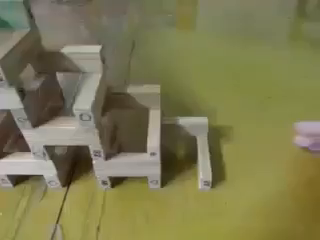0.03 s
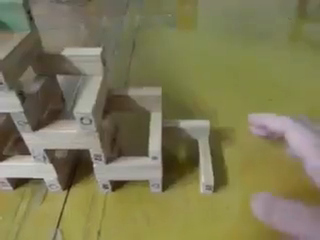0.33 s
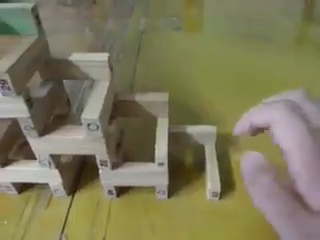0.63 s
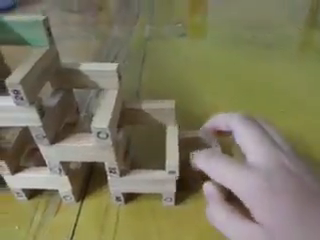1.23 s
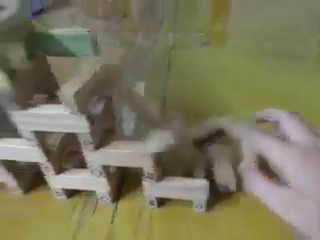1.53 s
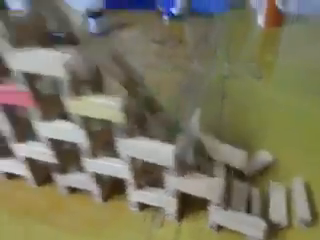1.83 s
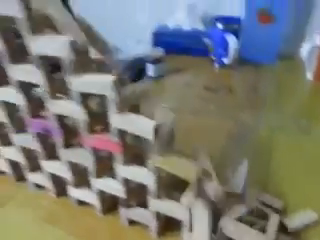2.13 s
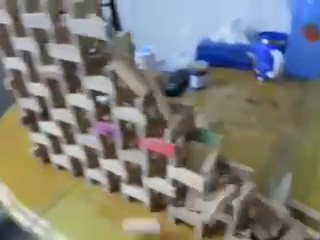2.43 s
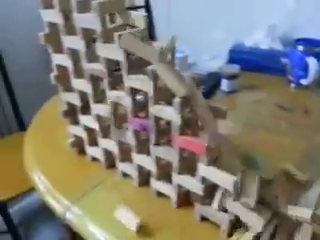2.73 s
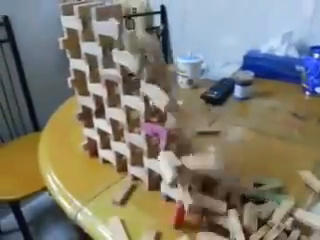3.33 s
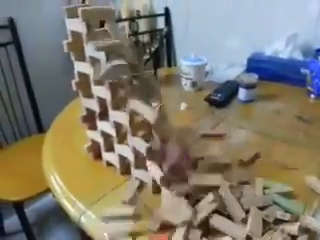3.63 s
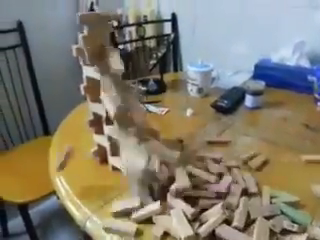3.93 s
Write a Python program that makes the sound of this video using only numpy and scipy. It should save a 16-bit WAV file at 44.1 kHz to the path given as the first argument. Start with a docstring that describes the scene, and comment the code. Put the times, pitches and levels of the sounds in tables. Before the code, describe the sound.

Small wooden blocks topple onto a table in a dense, continuous clatter.

```python
"""A tall wall of small wooden blocks falls onto a wooden table in a small room. First, over faint room noise, a
hand bumps the table, then pushes a block, which squeaks and tips over. An unbroken clatter follows, in which a
few early blocks drop hollowly on the bare table: flat faces knock, edges tick and the tabletop drums, deeper as
the heap grows. Heavy clumps crash down along the way, and midway the microphone is jogged. The clatter runs to
the end, with a limiter softening its loudest moments."""
import sys
import numpy as np
from scipy import signal
from scipy.io import wavfile
from scipy.ndimage import uniform_filter1d

SR = 44100
rng = np.random.default_rng(int(sys.argv[2]) if len(sys.argv) > 2 else 0)


def generate_wav(sig):
    """Save sig (samples, or channels by samples) to the path in sys.argv[1] as 16-bit PCM at SR."""
    pcm = np.round(np.clip(np.atleast_2d(sig).T, -1, 1) * 32767).astype(np.int16)
    wavfile.write(sys.argv[1], SR, pcm)


N = 176400


def amp(db):
    """Turn decibels into a number to multiply by."""
    return 10 ** (np.asarray(db) / 20)


def unit_level(x):
    """Scale a sound to an average power of 1."""
    return x / np.sqrt(np.mean(x ** 2) + 1e-20)


def value_at(points, hz):
    """Read between a table's points, along a pitch-like (log) scale."""
    f, value = np.transpose(points)
    return np.interp(np.log(hz + 1), np.log(f + 1), value)


def add(mix, s, sound):
    """Mix a sound in, starting at s seconds."""
    part = mix[:, max(round(s * SR), 0):][:, :sound.shape[1]]
    part += sound[:, :part.shape[1]]


def convolve(x, response):
    """Let every sample of x set off its own copy of the response."""
    return signal.oaconvolve(np.atleast_2d(x), np.atleast_2d(response), axes=1)[:, :N]


def colour(x, points, size=4096):
    """Turn lows and highs up or down as a tone table says."""
    log_gain = np.log(amp(value_at(points, abs(np.fft.fftfreq(size, 1 / SR)))))
    spectrum = np.exp(np.conj(signal.hilbert(log_gain)))  # nothing rings ahead of a hit
    return convolve(x, np.fft.ifft(spectrum).real[:size // 2])


def stereo_noise(length, apart):
    """Left and right noise: a shared part and a part that differs."""
    mid, side = rng.standard_normal((2, length))
    return np.array([mid + apart * side, mid - apart * side])


# tone of the room noise: f/Hz, level/dB
AIR_TONE = [(30, 1), (150, -1.5), (260, -7), (404, 1), (600, -10), (1400, -15), (7060, -17.5),
            (15000, -34)]


def air(start_s=0.42, fade_s=0.049, level_db=-61.5):
    """Quiet room noise fades in."""
    fade_in = np.clip((np.arange(N) / SR - start_s) / fade_s, 0, 1)
    return amp(level_db) * unit_level(colour(stereo_noise(N, 0.85), AIR_TONE)) * fade_in


# notes the tabletop rings at: f/Hz, level/dB, fade/s (time to drop 60 dB, t60 in the code)
TABLE_NOTES = [(133.2, -12, 0.25), (179.3, -14, 0.19), (253.2, -7, 0.19), (321, -5.5, 0.1),
               (352.8, -4, 0.13), (411, -12.5, 0.13), (514.7, -4, 0.081), (567, -8.5, 0.082),
               (666, 1.5, 0.033), (802.6, 7, 0.054), (863, 3.5, 0.042), (1075, 1.5, 0.025)]


def tabletop(blows, thud, size=12000):
    """Each blow makes the table ring, along with a dead thud."""
    t = np.arange(size) / SR
    ring = thud * stereo_noise(size, 1.0) * np.exp(-t / 0.035)
    for hz, db, t60 in TABLE_NOTES:
        phase = rng.uniform(0, 2 * np.pi) + hz / 1300 * rng.standard_normal((2, 1))
        ring += amp(db - 60 * t / t60) * np.sin(2 * np.pi * hz * t + phase)
    return convolve(blows, ring / np.linalg.norm(ring[0]))


# the bump and the push: t/s, level/dB, rise/s, fade/s, squeak/dB, dull above/Hz
HAND_TOUCHES = [(.512, -47, 0.03, 0.45, -26, 496), (1.33, -35, 0.017, 1, -5, 2200)]
# tone of the rubbed table: f/Hz, level/dB
HAND_TONE = [(30, 5), (190, 5.5), (370, 7.5), (560, -1.5), (1700, 1), (14000, -25)]


def hand(slips_per_s=900, squeak_hz=853, squeak_width_hz=45):
    """A hand bumps the table, then pushes a block, which sticks and slips with a short squeak."""
    out, t = np.zeros((2, N)), np.arange(N) / SR
    squeak_filter = signal.iirpeak(squeak_hz, squeak_hz / squeak_width_hz, SR)
    for s, db, rise, t60, squeak_db, dull_hz in HAND_TOUCHES:
        slips = (rng.random(N) < slips_per_s / SR) * rng.standard_normal(N)
        wood = colour(tabletop(slips, thud=1.53), HAND_TONE)
        body = unit_level(signal.lfilter(*signal.butter(2, dull_hz, fs=SR), wood))
        squeak = unit_level(signal.lfilter(*squeak_filter, slips))
        grit = unit_level(colour(stereo_noise(N, 0.91), AIR_TONE))
        loudness = np.minimum(t / rise, 1) * amp(db - 60 * np.maximum(t - rise, 0) / t60)
        add(out, s, loudness * (body + amp(squeak_db) * (squeak + amp(-7.5) * grit)))
    return out


def strike(ring_hz, notes, crack, crack_s, size=2048):
    """One hit on wood: a crack of noise and fading notes, a little different in each ear."""
    t = np.arange(size) / SR
    sound = crack * stereo_noise(size, 0.6) * np.exp(-t / crack_s)
    for ratio, db, t60 in notes:
        hz = ring_hz * ratio * (1 + (ratio != 1) * 0.057 * rng.standard_normal())
        phase = rng.uniform(0, 2 * np.pi) + 1.15 * rng.standard_normal((2, 1))
        sound += amp(db - 60 * t / t60) * np.sin(2 * np.pi * hz * t + phase)
    sound *= 1 - np.exp(-t / 0.00014)
    return sound / abs(sound).max()


def play_hits(rows, hit, spread_db):
    """Play listed hits, each somewhere between left and right."""
    out = np.zeros((2, N))
    for s, db, hz in rows:
        balance_db = np.array([[1], [-1]]) * spread_db * rng.uniform(-1.2, 1)
        add(out, s, hit(hz) * amp(db + balance_db))
    return out


# notes of a block hit on its edge: multiple of its pitch, level/dB, fade/s
EDGE_NOTES = [(.55, -10, 0.0031), (0.858, -7.5, 0.01), (1, -3, 0.0079)]


def tick(ring_hz):
    """A block's edge catches another and rings very briefly."""
    return strike(ring_hz, EDGE_NOTES, crack=0.42, crack_s=0.0028)


# how long the room echoes: f/Hz, fade/s
ROOM_FADES = [(100, 0.69), (400, 0.32), (1000, 0.24), (2500, 0.38), (6000, 0.3), (14000, 0.13)]


def room(x, size=22050):
    """A smooth echo, each pitch fading at its own speed; three echoes take turns as the blocks move."""
    out = np.zeros((2, N))
    for k in range(3):
        hz, t, bands = signal.stft(rng.standard_normal((2, size)), SR, nperseg=256)
        fade = amp(-60 * t / value_at(ROOM_FADES, hz)[:, None])
        echo = signal.istft(bands * fade * (1 - np.exp(-t / .004)), SR, nperseg=256)[1]
        turn = np.cos(np.pi * (np.arange(N) / SR * 7 + k / 3)) / np.sqrt(1.5)
        out += convolve(x * turn, echo / np.linalg.norm(echo[0]))
    return out


# the pushed block tipping, and blocks dropping on the table: t/s, level/dB, f/Hz
TIPPING_HITS = [(1.479, -12, 1790), (1.4815, -10, 2190)]
TABLE_DROPS = [(1.568, -18, 511), (1.652, -21, 530), (1.768, -18.5, 620)]
# hollow notes of a drop: multiple of its pitch, level/dB, fade/s
HOLLOW_NOTES = [(.8, -2, .1), (1, 0, .11), (1.22, 0, .09)]
# tone of the tipping block, and of blocks landing flat: f/Hz, level/dB
TIPPING_TONE = [(100, -25), (1500, 6), (2400, 6), (3400, -12)]
FLAT_TONE = [(60, -35), (300, -1), (800, 3), (1300, 6.5), (1650, 3.5), (3300, 4), (5000, 2.5), (7500, -5.5),
             (15000, -63)]


def first_blocks():
    """A block tips against its neighbour with a dull double knock; a few early blocks drop hollowly on the bare
    table."""
    def drop(hz):
        return strike(hz, HOLLOW_NOTES, crack=0, crack_s=1, size=8192)

    tip = colour(play_hits(TIPPING_HITS, tick, spread_db=4.5), TIPPING_TONE)
    drops = play_hits(TABLE_DROPS, drop, spread_db=3)
    return tip + amp(-6) * room(tip) + colour(drops, FLAT_TONE)


# notes of a block landing flat: multiple of its pitch, level/dB, fade/s
FLAT_NOTES = [(0.499, -8.5, .014), (0.781, -4, 0.012), (1, -3, 0.036), (1.332, -3, 0.019),
              (1.94, -2, 0.0057)]


def knock(ring_hz):
    """A block lands on its flat face and rings."""
    return strike(ring_hz, FLAT_NOTES, crack=0.79, crack_s=0.0035)


FALL_START_S = 1.528


def shower(hit, pitches, spread_db, count):
    """Many nearly identical blocks collide at random moments and strengths."""
    blocks = [hit(hz * (1 + .014 * rng.standard_normal())) for hz in np.resize(pitches, 60)]
    out = np.zeros((2, N))
    for k, (when, which, force, place) in enumerate(rng.random((count, 4))):
        s = FALL_START_S + (N / SR - FALL_START_S) * (k + when) / count
        balance_db = np.array([[10], [-10]]) * (place - .5)
        add(out, s, blocks[int(which * len(blocks))] * amp(spread_db * force + balance_db))
    return out


# parts of the wall giving way: t/s, length/s, tabletop/dB, knocks/dB, ticks/dB
WALL_TUMBLES = [(1.54, 0.088, -30, -21.5, -23), (1.647, 0.044, -25, -21, -17.5),
                (1.703, 0.041, -23.5, -15.5, -23), (1.748, 0.049, -21, -18.5, -35),
                (1.843, 0.066, -25, -23, -18), (1.919, 0.019, -19.5, -16, -31.0),
                (1.953, 0.037, -21.5, -18, -25.5), (2.015, 0.0072, -13.5, -4.5, -28),
                (2.036, 0.045, -22, -14, -26.5), (2.116, 0.03, -17, -17.5, -23.5),
                (2.158, 0.013, -22.5, -13, -21), (2.189, 0.06, -26.5, -14, -33),
                (2.237, 0.092, -22.5, -21, -29), (2.362, 0.036, -28.5, -24, -35),
                (2.395, 0.043, -26, -15.5, -20.5), (2.439, 0.067, -35, -18.5, -36),
                (2.507, 0.1, -26, -22, -18.5), (2.589, 0.047, -30, -20, -13),
                (2.672, 0.055, -25.5, -16.5, -19), (2.738, 0.074, -31, -22.5, -21.5),
                (2.812, 0.015, -25.5, -19.5, -15.5), (2.823, 0.071, -30, -25, -22.5),
                (2.907, 0.1, -27, -19.5, -20.5), (3.025, 0.049, -31, -18, -23),
                (3.084, 0.011, -19, -4.5, -30), (3.1, 0.013, -26, -11.5, -17.5),
                (3.12, 0.023, -30.5, -19.5, -22), (3.151, 0.043, -30, -20, -17),
                (3.269, 0.093, -28, -18.5, -23), (3.32, 0.051, -37, -24, -23),
                (3.457, 0.039, -39, -17.5, -21), (3.491, 0.049, -28.5, -15, -17),
                (3.549, 0.019, -29, -21.5, -16), (3.638, 0.087, -31, -22, -16.5),
                (3.769, 0.068, -25, -17.5, -17), (3.815, 0.032, -22.5, -16, -14),
                (3.858, 0.04, -31, -17, -24), (3.905, 0.089, -28, -16.5, -18.5)]
# the lull between tumbles: tabletop/dB, knocks/dB, ticks/dB
LULL_LEVELS = [-32.5, -25.5, -32.5]


def tumble_levels(build_s=0.021, rise_s=0.0041, fade_s=0.075):
    """Each tumble starts suddenly, holds for its length and dies quickly into the lull."""
    t = np.arange(N) / SR
    gain = amp(LULL_LEVELS)[:, None] * np.clip((t - FALL_START_S) / build_s, 0, 1)
    for s, length, *db in WALL_TUMBLES:
        span = slice(round(s * SR) - SR // 100, round(s * SR) + SR // 2)
        age = t[span] - s
        shape = np.clip(age / rise_s + .5, 0, 1) * amp(-60 * np.maximum(age - length, 0) / fade_s)
        gain[:, span] = np.maximum(gain[:, span], amp(db)[:, None] * shape)
    return gain


# tone of the drumming table, and of edge hits: f/Hz, level/dB
TABLE_TONE = [(25, -51), (70, -19), (200, -0.5), (300, 1), (800, -1.5), (1300, 7), (2500, -27), (8000, -51)]
EDGE_TONE = [(100, -16.5), (1000, -5), (3000, 8), (4500, 2.5), (7200, 3.5), (8600, -3), (13500, -22.5)]
# the table's bass growing with the heap: t/s, level/dB
BASS_RISE = [(1.55, -6), (2.6, 2.5)]
# pitches the blocks share: f/Hz
KNOCK_PITCHES, TICK_PITCHES = [1621, 1798, 2062, 2319], [4860, 5650, 5910, 6630, 7230]


def clatter(blows_per_s=700, bass_hz=404):
    """The falling mass drums on the table, knocks and ticks, swelling with every tumble."""
    blows = (rng.random(N) < blows_per_s / SR) * rng.standard_normal(N)
    drum = colour(tabletop(blows, thud=1.35), TABLE_TONE)
    bass = signal.sosfiltfilt(signal.butter(2, bass_hz, fs=SR, output="sos"), drum)
    bass_gain = amp(np.interp(np.arange(N) / SR, *np.transpose(BASS_RISE)))
    knocks = shower(knock, KNOCK_PITCHES, spread_db=18.5, count=560)
    ticks = shower(tick, TICK_PITCHES, spread_db=21, count=760)
    layers = (drum + bass * (bass_gain - 1),
              colour(knocks + amp(-2) * room(knocks), FLAT_TONE),
              colour(ticks + amp(-6) * room(ticks), EDGE_TONE))
    start = round(FALL_START_S * SR)
    return sum(gain * x / x[:, start:].std() for x, gain in zip(layers, tumble_levels()))


def clack(ring_hz):
    """A nearby block lands squarely, with a short, hard crack."""
    return strike(ring_hz, FLAT_NOTES, crack=1.48, crack_s=0.0018)


# nearby blocks landing flat, and catching each other's edges: t/s, level/dB, f/Hz
NEAR_KNOCKS = [(1.5307, -1.5, 2130), (1.7034, -3, 2380), (1.7453, 0.5, 1590), (1.8296, -8, 3240),
               (1.9205, -1, 1570), (2.0121, 2.5, 2336), (2.08, 2.5, 2060), (2.1912, -4.5, 1840),
               (2.2464, -1, 1620), (2.2874, -1, 2200), (2.3342, -4.5, 1410), (2.3616, -1, 1690),
               (2.4845, -2.5, 1830), (2.5, -7, 3200), (2.8255, -0.5, 2410), (3.2282, 1, 2330),
               (3.2697, 2, 1850), (3.3746, -4, 2050), (3.4395, -3.5, 2030), (3.586, -2, 2243),
               (3.6356, -0.5, 1550), (3.6751, 2.5, 1670), (3.8838, -2.5, 2220)]
NEAR_TICKS = [(1.5278, -3.5, 6720), (1.5879, -5.5, 5300), (1.6155, -12, 5500), (1.6494, -9, 5410),
              (1.6954, -12, 6400), (1.7044, -6, 4800), (1.7442, -16, 5030), (1.7657, -6, 5730),
              (1.8303, -8, 5500), (1.8369, -2, 5780), (1.9646, -12, 5400), (2.0502, -6.5, 6100),
              (2.1176, -12.5, 5370), (2.2755, -6, 5720), (2.2825, -6.5, 6400), (2.3174, -12, 6330),
              (2.361, -8, 5230), (2.3964, -4, 6000), (2.4596, -3.5, 6160), (2.4699, -7.5, 6580),
              (2.5181, -1, 6970), (2.5663, -6, 6400), (2.6346, 1, 5340), (2.6415, 1.5, 6370),
              (2.7548, -0.5, 7470), (2.8338, -4, 6200), (2.8507, -4, 5330), (2.858, -5, 5830),
              (2.8737, -4, 6160), (2.9119, -6, 5400), (2.9622, -10, 6000), (3.003, -5, 6700),
              (3.0338, -6.5, 5930), (3.0619, -6.5, 5860), (3.1297, -5, 7460), (3.1816, -2, 5660),
              (3.2369, 0, 6100), (3.2463, -3, 6860), (3.3078, -7, 6900), (3.389, -7.5, 5590),
              (3.4003, -12, 7210), (3.4082, 1, 7200), (3.4417, -5.5, 5820), (3.4711, -7, 6800),
              (3.5923, 0, 7700), (3.6183, -14, 5640), (3.6322, -5, 6100), (3.7067, -3.0, 7700),
              (3.7839, -12, 5700), (3.8382, -4, 5800), (3.905, -12, 7140)]
# extra brightness of nearby ticks: f/Hz, level/dB
NEAR_BRIGHTNESS = [(8000, 0.5), (12000, 6)]


def near_blocks():
    """Single hits stand out of the mass: the knocks shake the table, the ticks stay bright."""
    knocks = play_hits(NEAR_KNOCKS, clack, spread_db=2)
    ticks = play_hits(NEAR_TICKS, tick, spread_db=3.5)
    blows = np.zeros((1, N))
    for s, db, _ in NEAR_KNOCKS:
        add(blows, s, np.full((1, 1), amp(db)))
    knocks = colour(knocks + amp(-13.5) * room(knocks), FLAT_TONE)
    ticks = colour(colour(ticks, NEAR_BRIGHTNESS) + amp(-8) * room(ticks), EDGE_TONE)
    drum = amp(-1.0) * colour(tabletop(blows, thud=0.47), TABLE_TONE)
    return knocks + ticks + drum


# heavy clumps hitting the table: t/s, level/dB, length/s, ticks against knocks/dB, thud/dB
CLUMPS = [(2.016, -6, .008, -19, -11), (2.164, -20.5, 0.011, 11.5, -29), (3.083, -1.5, 0.02, -7, -5.5),
          (3.807, -3.5, 0.021, 0.5, -5)]


def crashes(count=7, thud_hz=260):
    """A clump lands as a quick, weakening run of knocks and ticks over a low thud."""
    out, t = np.zeros((2, N)), np.arange(SR // 4) / SR
    for s, db, length, tick_db, thud_db in CLUMPS:
        for k, (when, low, high) in enumerate(rng.random((count, 3))):
            late = (k + when * (k > 0)) / count
            hit = knock(1550 + 900 * low) + amp(tick_db) * tick(5000 + 2200 * high)
            add(out, s + length * late ** 2, amp(db - 17.2 * late) * hit)
        burst = stereo_noise(len(t), 0.51) * np.exp(-t / 0.0064)
        add(out, s, amp(thud_db) * signal.lfilter(*signal.butter(2, thud_hz, fs=SR), burst))
    return colour(out, [(30, 0.5), (2000, 13.5), (7000, 13.0), (10000, -2)])


def jolt(start_s=2.5195, width_s=.0018):
    """One slow swing of pressure, mostly on the right, as the microphone is jogged."""
    out, age = np.zeros((2, N)), np.arange(SR // 10) / SR / width_s
    swing = age * (2 - age) * np.exp(-age)
    add(out, start_s, amp([[-18.5], [-4.5]]) * swing)
    return out


def scene():
    """All the sounds together."""
    return air() + hand() + first_blocks() + clatter() + near_blocks() + crashes() + jolt()


# left-right difference, small where both microphone openings hear the table alike: f/Hz, level/dB
STEREO_WIDTH = [(100, -1), (500, -6.5), (1300, 1)]
# tone of the left opening; the right has the opposite: f/Hz, level/dB
LEFT_TONE = [(50, -0.5), (280, 1.63), (2200, -1), (4200, -.5), (5700, 1.5), (7300, -3.5), (14000, 1)]


def record(dry, limit_db=-16, cut_share=0.18, recover_db_per_s=234, top_hz=14900):
    """The microphone colours the sound, a fast limiter turns loud parts down, the top treble is cut."""
    mid, side = dry.mean(0), colour((dry[0] - dry[1]) / 2, STEREO_WIDTH)
    right_tone = [(hz, -db) for hz, db in LEFT_TONE]
    x = np.vstack([colour(mid + side, LEFT_TONE), colour(mid - side, right_tone)])
    power_db = 10 * np.log10(abs(uniform_filter1d((x ** 2).mean(0), size=128)) + 1e-12)
    fall = np.arange(N) * recover_db_per_s / SR
    held_db = np.maximum.accumulate(power_db + fall) - fall  # jumps up at a peak, then sinks steadily
    over_db = np.maximum(held_db - limit_db, 0)
    cut_db = cut_share * signal.lfilter([.02], [1, -.98], over_db)
    x = np.clip(x / amp(cut_db), -1, 1)  # the hardest hits still overload
    treble_cut = signal.firwin(255, top_hz, window=("kaiser", 7), fs=SR)
    return signal.oaconvolve(x, treble_cut[None], "same")


dry = scene()
out = record(dry)
generate_wav(out)
```